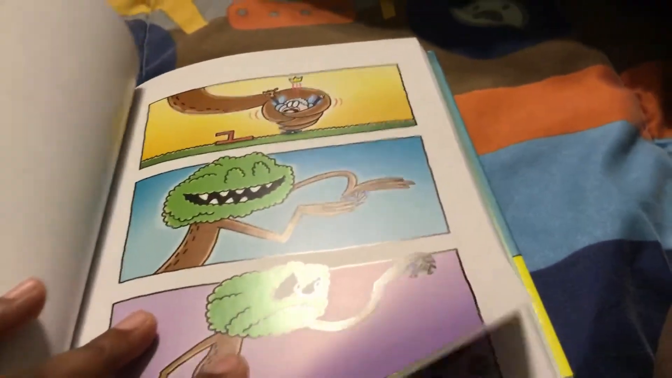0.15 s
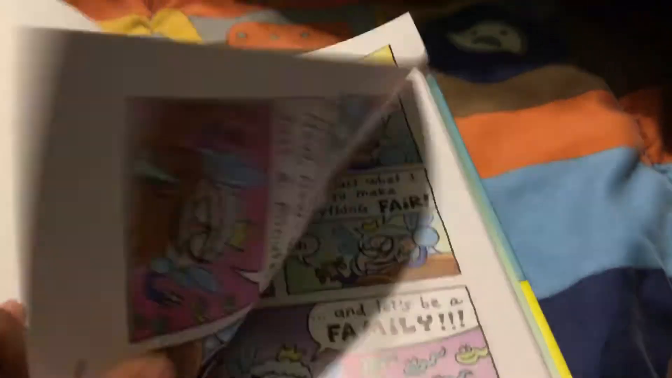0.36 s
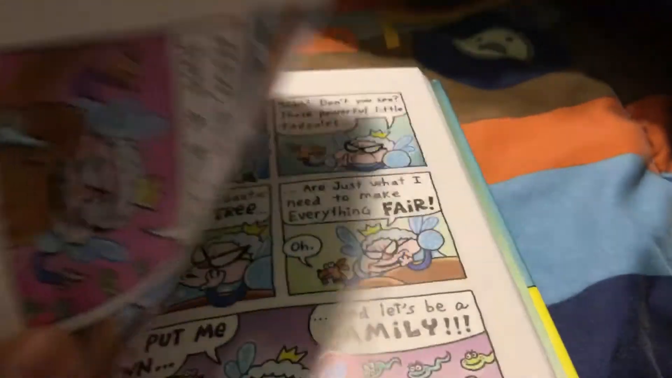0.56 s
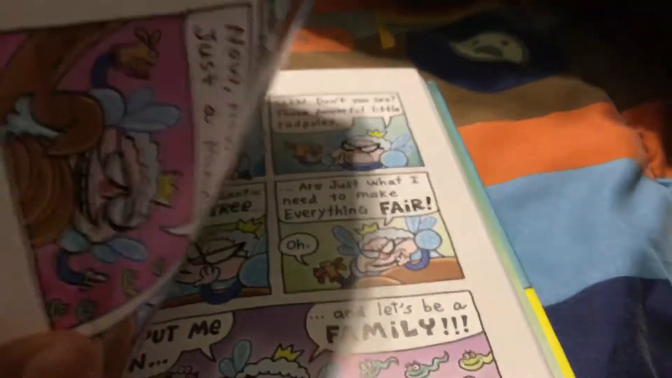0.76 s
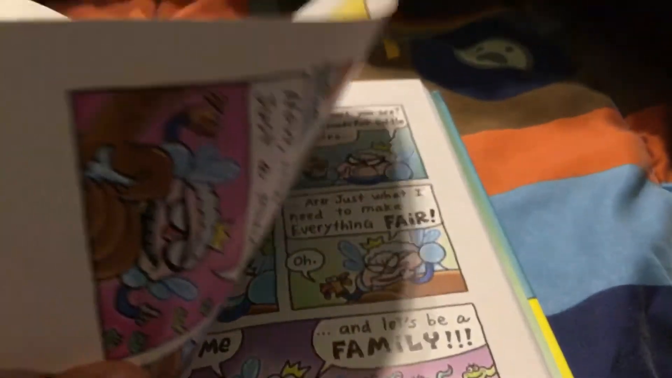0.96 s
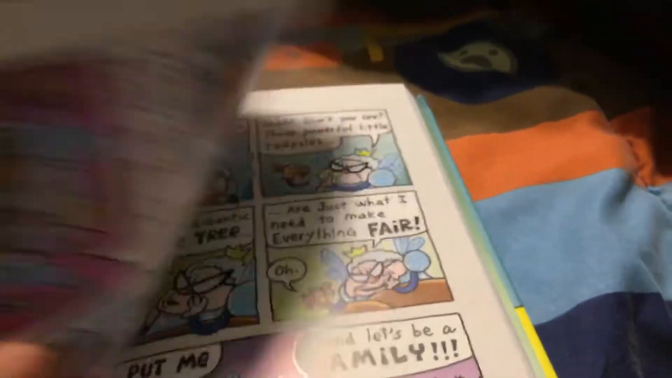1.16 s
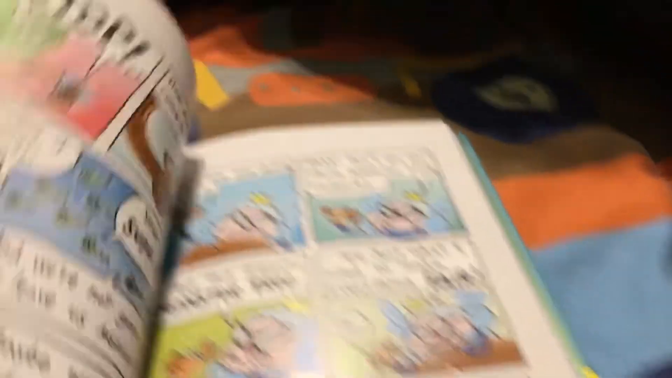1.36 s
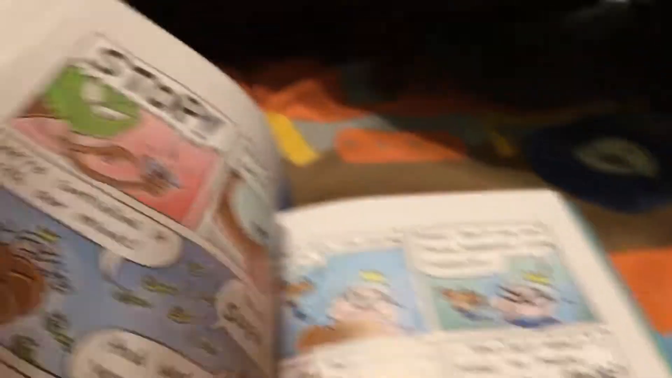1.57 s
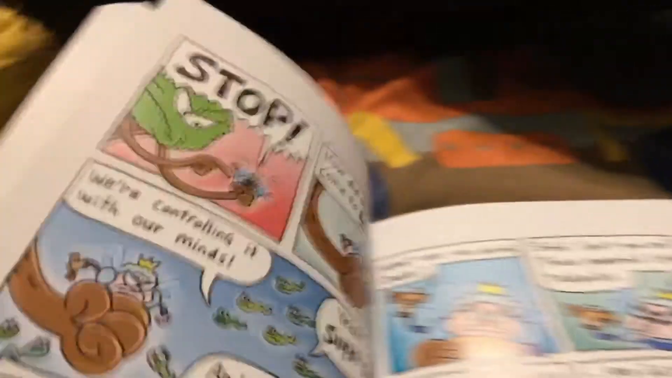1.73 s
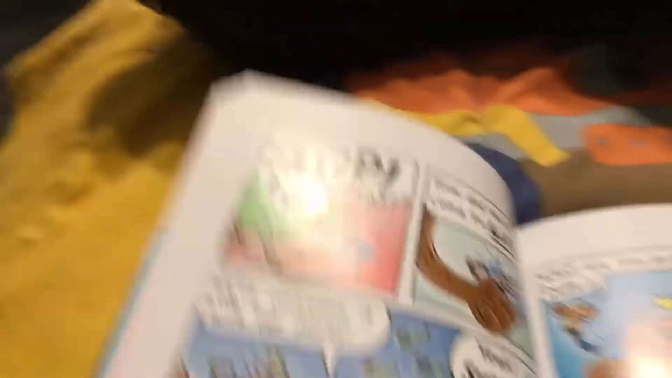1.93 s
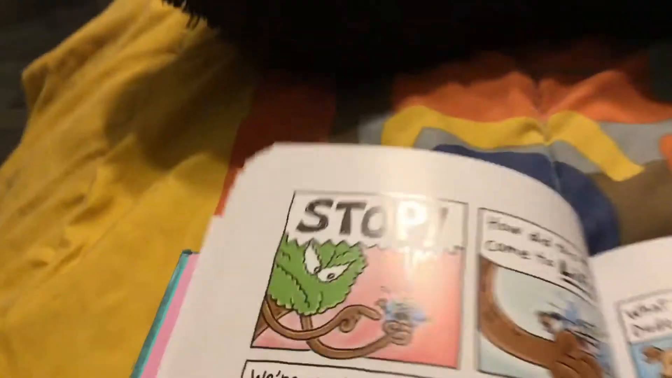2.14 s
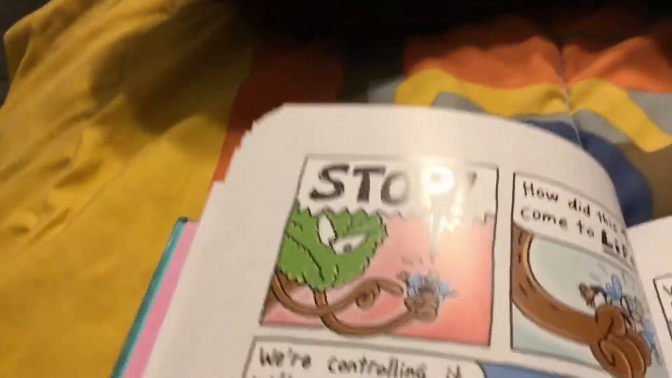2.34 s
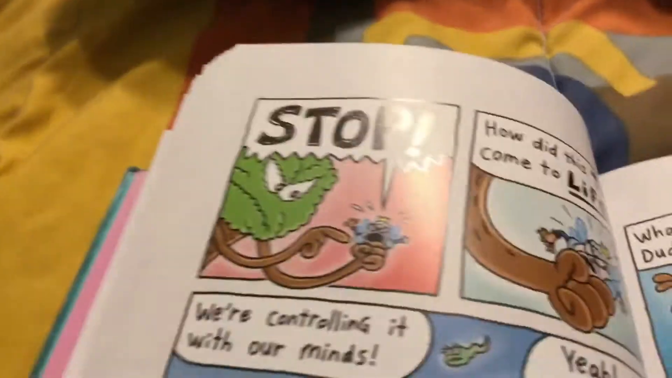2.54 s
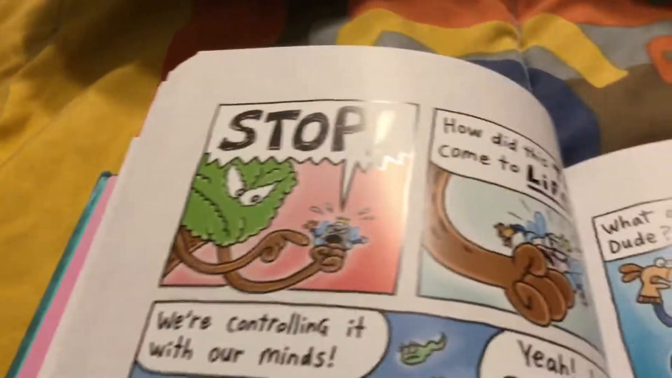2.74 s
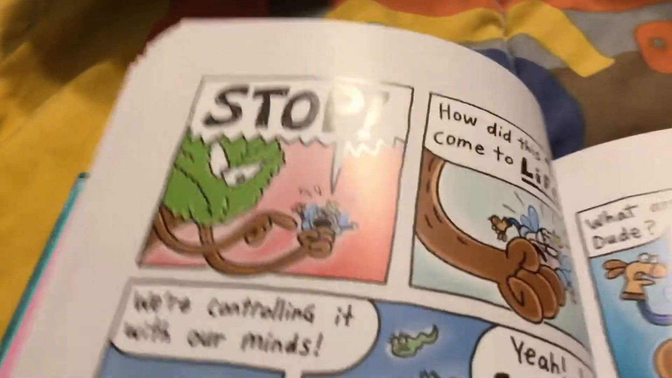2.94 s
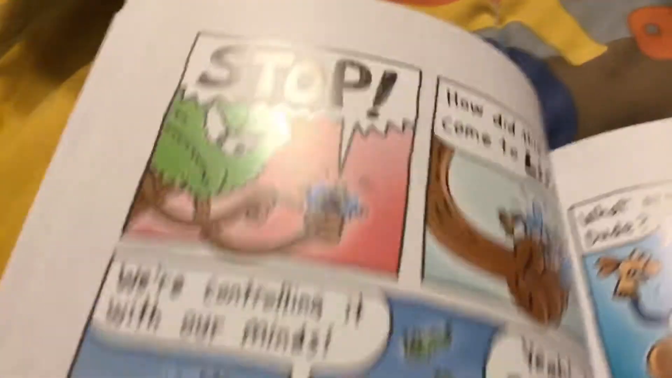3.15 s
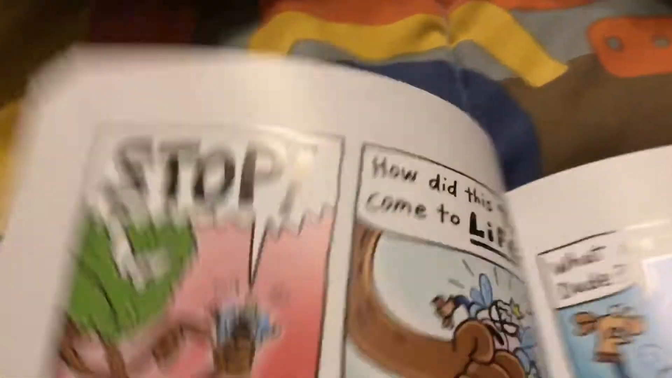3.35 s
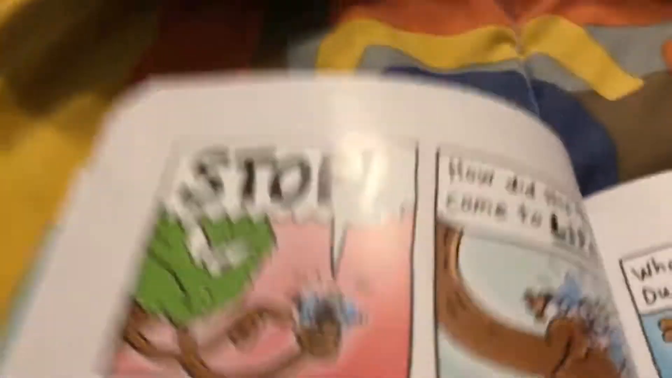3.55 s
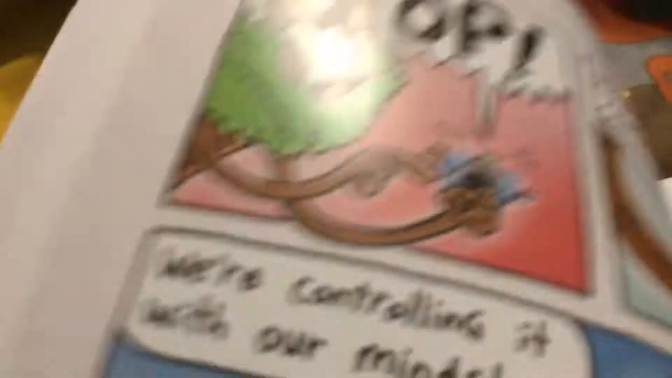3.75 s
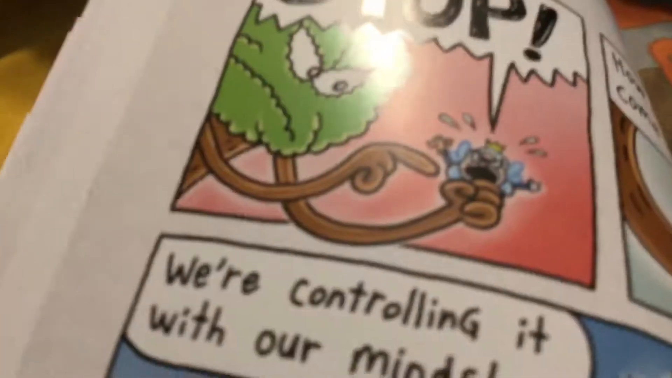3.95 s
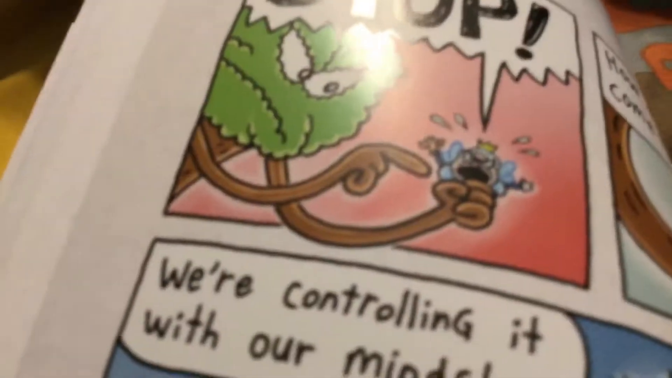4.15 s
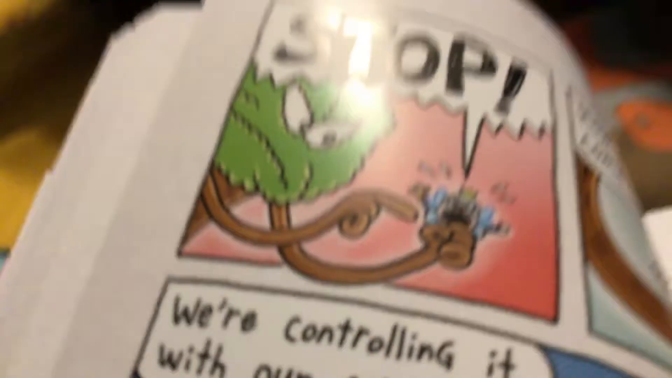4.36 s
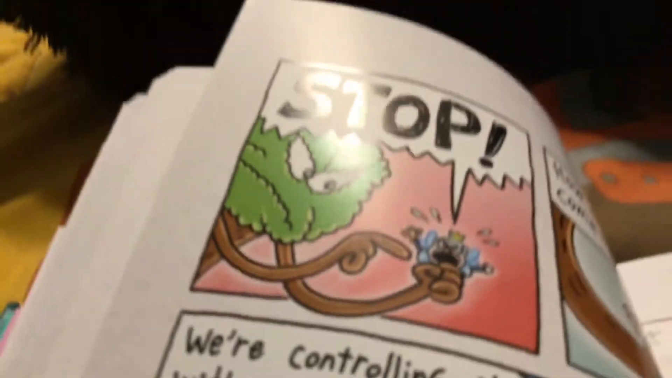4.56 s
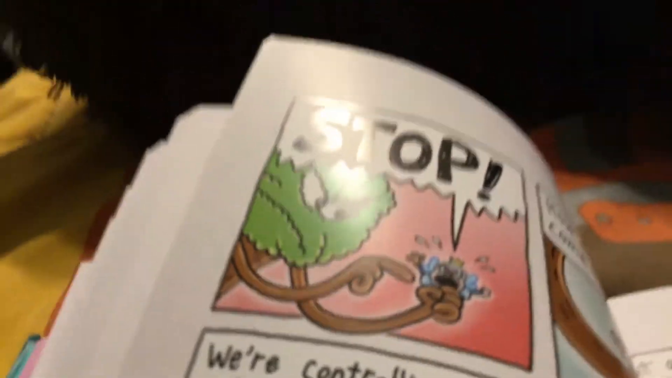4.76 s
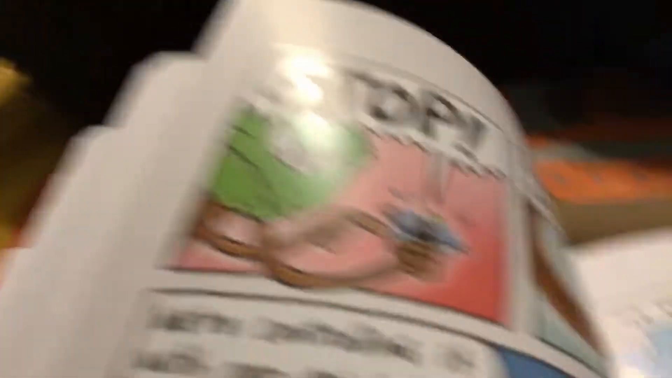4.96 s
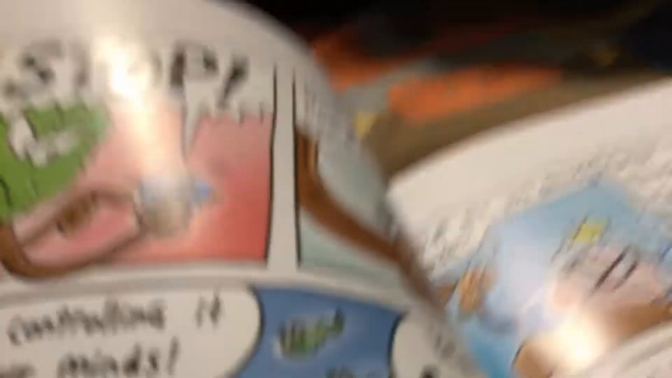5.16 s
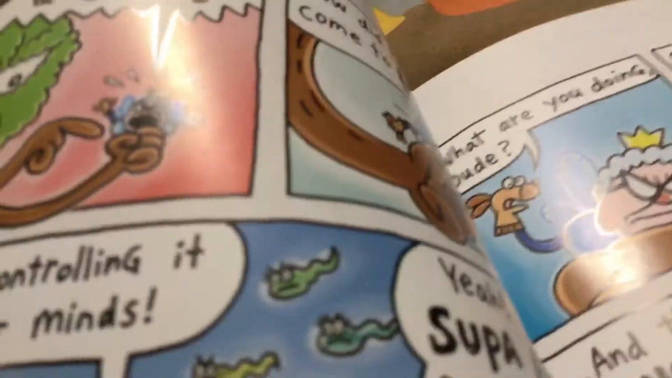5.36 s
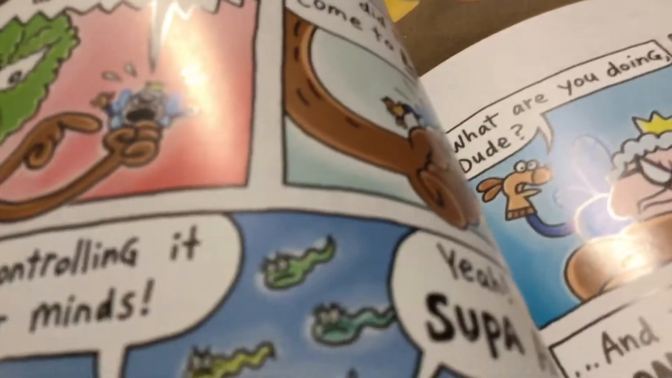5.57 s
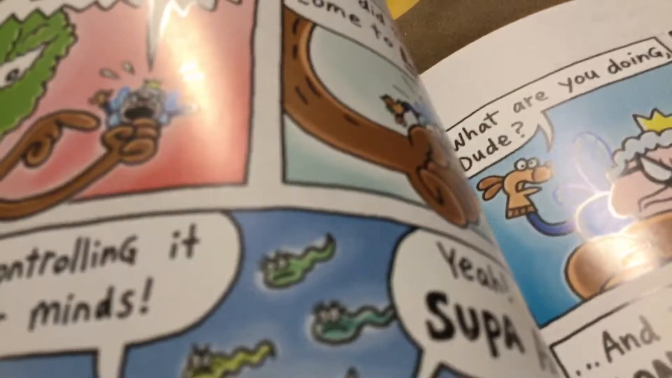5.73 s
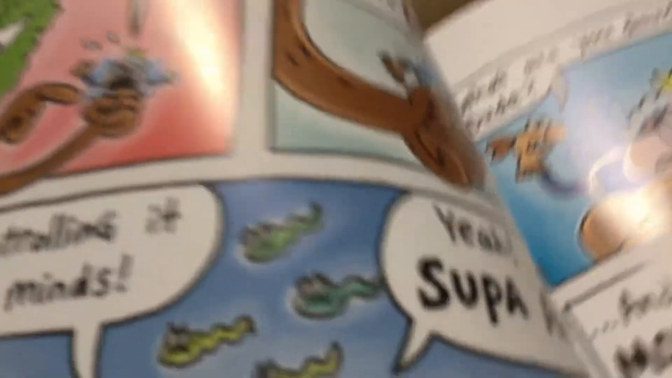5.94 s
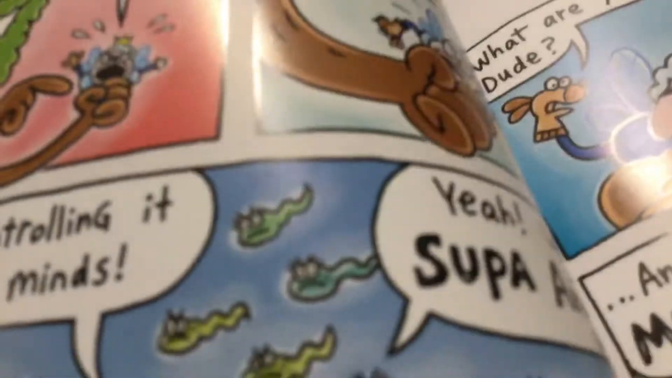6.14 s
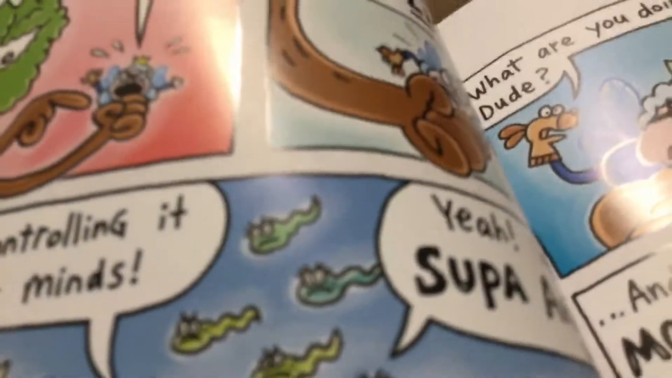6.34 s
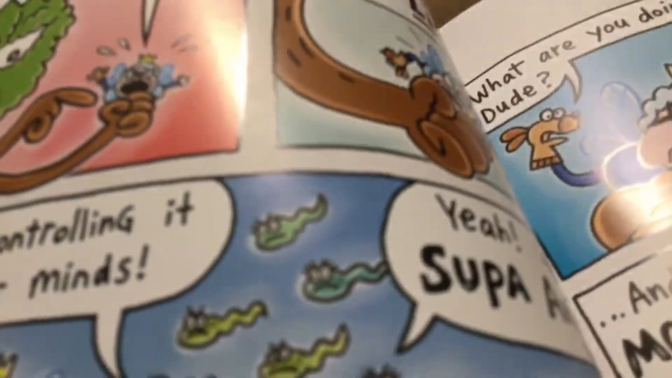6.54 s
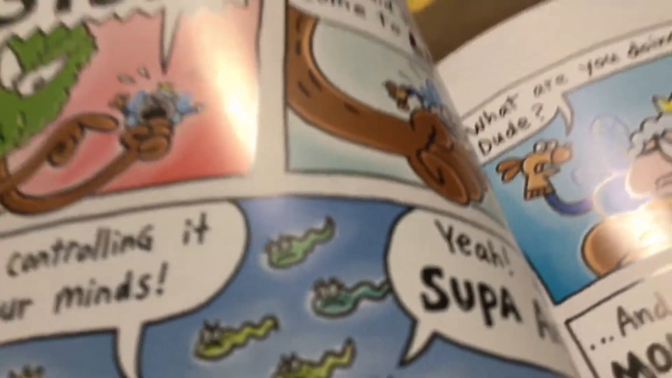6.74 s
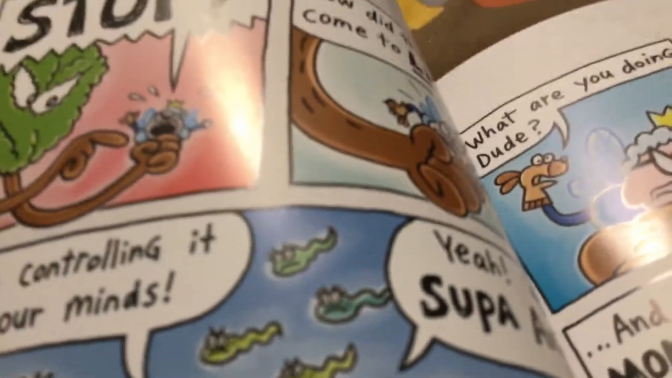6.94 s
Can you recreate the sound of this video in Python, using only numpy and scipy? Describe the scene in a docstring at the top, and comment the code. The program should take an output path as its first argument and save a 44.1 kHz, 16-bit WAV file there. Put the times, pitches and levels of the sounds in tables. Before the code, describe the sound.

Very close to the microphone in a small, quiet, dry room, a book's pages are handled. A faint bright slide comes first, then a quick run of low, thudding leaf flaps and crisp edge slaps. A quieter stretch of soft rubbing follows, broken by a sharp snap, then heavier finger drags with papery pops, another hard flap, and small fading crackles.

```python
"""In a small quiet room, close to a microphone, the pages of a book are turned and bent by hand.
Sheets slide with a grainy hiss and fingers drag on them: both are friction made of noise and small catches.
Bowed sheets ring along, and a loose leaf flaps as a dying swing that stirs low wafts of air.
Page edges slap in bursts of tiny impacts; bent paper and the binding snap with a crack and a bending wave."""
import sys
import numpy as np
from scipy import signal
from scipy.fft import rfft, irfft, next_fast_len
from scipy.io import wavfile

SR = 44100
rng = np.random.default_rng(int(sys.argv[2]) if len(sys.argv) > 2 else 0)


def generate_wav(signal):
    """Clip the signal to [-1, 1] and save it as 16-bit WAV at the path in sys.argv[1]."""
    frames = np.transpose(np.atleast_2d(signal))
    scaled = np.clip(frames, -1, 1) * 32767
    pcm = np.round(scaled).astype(np.int16)
    wavfile.write(sys.argv[1], SR, pcm)


N = 308686  # length in samples, about 7 s
TIME = np.arange(N) / SR
BURST = 4096  # length of one short sound in samples

# background of the quiet room: pitch_hz, level_db (relative)
FLOOR_COLOUR = [(30, -4.5), (100, 5), (250, -1), (500, -11), (1000, -54.5), (2000, -16), (5000, -20),
                (16000, -30)]
FLOOR_DB = -69.5
# the holding hand never quite rests: start_s, level_db (of its faint friction, before the rub trim)
HOLD = [(0, -71), (.85, -66.5), (1.2, -65), (1.6, -65.5), (1.9, -66), (2.38, -67), (3.3, -62.5),
        (4.0, -62.5), (4.63, -63.5), (5.2, -59.5), (5.7, -72.5), (6.2, -66.5), (6.5, -69), (7, -69)]
HOLD_HZ, HOLD_HISS_DB, HOLD_TOP_DB = 830, -7.5, -1.5
# fingers drag across a sheet: start_s, swell_s, ease_s, level_db (before the rub trim), centre_hz
RUBS = [(.28, 0.19, .11, -62, 2200), (1.075, .01, 0.081, -51, 1210), (1.18, 0.11, 0.077, -49, 1060),
        (1.32, 0.038, 0.18, -52.5, 1780), (1.61, .14, 0.077, -52, 1500), (2.0, 0.2, 0.063, -52.5, 1310),
        (2.48, 0.26, 0.035, -59, 1050), (2.98, .09, 0.17, -62, 900), (3.33, .17, 0.022, -54, 1600),
        (3.62, .17, 0.097, -47, 1210), (4.0, .16, 0.17, -46, 1160), (4.40, 0.071, 0.076, -55, 735),
        (4.72, 0.012, 0.083, -50, 1310), (4.87, .25, 0.057, -44, 1070), (5.19, 0.082, 0.052, -49, 970),
        (5.38, 0.058, 0.029, -52, 790), (5.55, 0.025, 0.034, -59.5, 900), (5.865, .025, 0.034, -60, 750),
        (5.94, 0.052, 0.15, -48.5, 940), (6.66, 0.09, .08, -63, 890)]
# one sheet slides over another: start_s, swell_s, ease_s, level_db, top_db (top octave against the hiss)
SLIDES = [(.13, 0.022, 0.17, -65, 6.5), (.225, 0.085, 0.089, -55, 1.5), (.37, .085, 0.12, -55, 2.5),
          (1.18, .04, 0.097, -55, -10), (1.29, 0.051, 0.13, -49.5, -1), (1.44, 0.034, 0.097, -48.5, -7.5),
          (1.61, .1, 0.13, -50, -3), (1.86, 0.011, 0.14, -61.5, -5), (2.02, .16, 0.078, -56, -3),
          (2.5, .22, .06, -65.5, -6), (2.96, .08, 0.083, -66.5, -7), (3.152, .025, 0.05, -49, -4.5),
          (3.22, 0.047, 0.034, -58.5, -8), (3.31, 0.18, .1, -55.5, -5.5), (3.68, .11, 0.072, -51.5, -3),
          (4.03, 0.12, 0.038, -56, -14), (4.21, 0.074, 0.053, -52, -21), (4.72, 0.033, 0.076, -67.5, -1),
          (4.91, 0.085, .03, -58, -8), (5.01, 0.016, 0.16, -44, -10.5), (5.15, 0.033, .16, -62, -13),
          (5.38, .06, 0.029, -66, -12), (5.94, 0.044, 0.12, -57.5, -5), (6.49, 0.071, 0.069, -70.5, 3),
          (6.72, 0.022, 0.065, -69, -4)]
# a stroke grows by SWELL dB to its peak, eases by EASE dB, and grips and lets go within the edge time
RUB_SWELL_DB, RUB_EASE_DB, RUB_EDGE_S = 11, 10, 0.0071
SLIDE_SWELL_DB, SLIDE_EASE_DB, SLIDE_EDGE_S = 10.5, 12.5, 0.014
# colour of the sliding hiss: pitch_hz, level_db (relative)
HISS_COLOUR = [(1200, -29), (2300, -3), (3100, 4.5), (4500, 3.5), (5800, 5), (7400, -0.5), (9000, -3.5),
               (16000, -7.5)]
# colour of a crack: pitch_hz, level_db (relative)
CRACK_COLOUR = [(1000, -16), (2500, -3), (4200, 0), (6000, -4), (8200, 1), (12000, -3), (16000, -9)]
# colour of stirred air: pitch_hz, level_db (relative)
WAFT_COLOUR = [(20, -36), (40, -6), (70, 4), (120, 1.5), (220, -1.5), (350, -7), (700, -49.5), (2000, -58)]
# a bowed sheet rings while it is stroked: start_s, length_s, level_db, pitch_hz (midway), glide_octaves_per_s
SWISHES = [(0.112, .1, -63.5, 7530, 4), (0.279, .26, -56.5, 7170, -0.2), (1.388, 0.1, -57.5, 1405, 2),
           (2.0, .16, -57.5, 1262, 0), (2.046, 0.2, -63, 2800, 0.5), (3.025, 0.097, -57.5, 730, 1),
           (3.147, .15, -57.5, 7300, -2), (3.269, 0.12, -57.5, 755, 0), (3.371, .17, -55, 1200, 2),
           (3.456, 0.072, -51, 2770, -.5), (3.458, 0.15, -61.5, 7030, -1.5), (3.66, .13, -51.5, 1280, -2),
           (6.522, 0.074, -69, 8350, 3)]
# a loose leaf swings and pushes air: start_s, level_db (near the peak), swing_hz (middle of its slowing rate)
FLAPS = [(0.563, -49.5, 238), (0.678, -48, 107), (0.8197, -28.5, 91.5), (.96, -39, 103),
         (1.021, -35.5, 104), (1.07, -24, 106.5), (1.1716, -22, 107), (1.208, -22.5, 85),
         (1.2391, -25.5, 106), (1.262, -29.5, 180), (1.289, -31.5, 110), (1.302, -34.5, 220),
         (1.373, -29, 148), (1.411, -41, 98), (1.4797, -32.5, 159), (1.718, -32.5, 221), (1.727, -32.5, 77),
         (1.752, -36.5, 167), (2.517, -50, 333), (3.605, -37.5, 112), (3.782, -38.5, 302),
         (5.1134, -21, 189), (5.131, -34.5, 129), (5.866, -46, 172), (5.894, -49, 110), (6.015, -52, 111),
         (6.665, -47.5, 128)]
SWINGS = 6.05  # swings until a leaf has come to rest (60 dB down)
# a page edge slips free and strikes its neighbours:
# time_s, level_db, rise_ms, fall_ms, centre_hz, slope_db_per_octave (above the centre)
SLAPS = [(0.676, -49.5, 9.8, 6.8, 1320, -2), (0.82, -38.5, 0.13, 4, 765, -1), (.867, -58, 3, 3, 3000, -11),
         (0.9038, -54.5, 1.2, 0.89, 1200, -6.5), (0.9124, -57, 1, 2, 1500, -6),
         (0.961, -45.5, 2.5, 1.3, 2000, -10), (1.0189, -47, 1.3, 2.1, 2800, -7.5),
         (1.0664, -30.5, 0.56, 3.4, 2950, -10), (1.078, -33, 0.93, 1.5, 2540, -23),
         (1.1682, -30, 1.5, 4.2, 4270, -10.5), (1.173, -39, .5, 1.5, 800, -2),
         (1.2032, -35.5, 0.65, 1.7, 1900, -5.5), (1.217, -38, 2.1, 1.3, 800, -1),
         (1.2348, -43, 3, 2.3, 1400, -5.5), (1.245, -44, 2.2, 1.5, 800, -4.5),
         (1.266, -51, 1.5, 1.7, 1500, -7), (1.2928, -49, 0.73, 2.7, 1300, -12),
         (1.3676, -29.5, 0.64, 6.1, 1630, -13), (1.379, -34, .5, 6.9, 1660, -19),
         (1.471, -37, 3.3, 4.6, 4700, -12.5), (1.4828, -31, 3.8, 4.9, 3850, -12),
         (1.624, -48, 1.6, 2.1, 1400, -0.5), (1.657, -41.5, 1.3, 3.9, 5960, -10),
         (1.689, -28.5, 5.2, 2, 7800, -25), (1.692, -22.5, 3.2, 0.39, 5360, -14),
         (1.716, -39.5, 1.4, 1.9, 790, -2), (1.731, -47, 2.6, 4.4, 800, -4.5),
         (1.7549, -37.5, 3.5, 2.8, 1940, -8.5), (1.784, -42, 4.9, 10, 5300, -17),
         (5.027, -40, 3.5, 4.4, 1200, -4.5), (5.1102, -28.5, 1.4, 1.1, 4400, -23),
         (5.1216, -33, 1, 1.8, 900, -19), (5.1328, -27, 0.51, 1.9, 4640, -39),
         (5.892, -50.5, 5.2, 2, 2520, -9.5), (6.742, -46, 1.3, 1.3, 3500, -24)]
# bent paper or the binding buckles: time_s, body_level_db, body_pitch_hz, crack_level_db (before the crack lift)
SNAPS = [(1.304, -47, 458, -68), (1.7709, -47.5, 1080, -41.5), (1.816, -67, 1640, -51.5),
         (1.8947, -67, 2280, -44), (2.3752, -27.5, 1180, -34), (2.596, -42.5, 890, -78),
         (2.609, -51.5, 1400, -79), (2.7426, -44.5, 1180, -82), (3.5164, -32.5, 1060, -67),
         (3.602, -38.5, 620, -56), (3.6043, -46, 560, -75), (3.7845, -48, 493, -61),
         (3.8336, -48.5, 780, -71), (3.8599, -40, 1020, -68), (3.8774, -39, 1560, -79),
         (3.8819, -40.5, 880, -75), (3.9421, -41.5, 950, -47), (4.026, -54, 1060, -78),
         (4.1704, -31.5, 2120, -38.5), (4.202, -44.5, 880, -67), (4.2977, -51.5, 1010, -54),
         (4.796, -49.5, 490, -75), (4.9003, -43.5, 560, -77), (4.9763, -41.5, 660, -62),
         (5.0689, -39, 1170, -55), (5.1155, -26, 480, -42), (5.132, -27, 970, -35.5),
         (5.4494, -55, 760, -69), (5.8653, -34, 520, -85), (5.8932, -38.5, 790, -48),
         (5.902, -44.5, 686, -63), (5.9589, -43.5, 573, -75), (5.9773, -59, 980, -48.5),
         (5.9868, -42.5, 840, -48), (6.015, -39, 706, -72), (6.0299, -45, 770, -75),
         (6.0453, -40, 765, -68), (6.133, -48, 780, -51.5), (6.7032, -56, 1870, -80),
         (6.743, -47, 1300, -49), (6.7916, -55, 1800, -62.5), (6.8257, -58, 1500, -67),
         (6.9317, -59.5, 650, -70), (6.94, -60.5, 1500, -66), (6.9603, -59.5, 1720, -60)]
ROOM_T60_S, ROOM_DB = 0.14, -28.5  # time for the echo to fall 60 dB, and its level
# colour of the microphone: pitch_hz, level_db (relative)
MIC_COLOUR = [(2500, 0), (3600, -1), (4400, 1), (5500, -2), (7400, 2), (8600, 0), (9900, -5), (12500, 0),
              (15500, -1)]
TOP_HZ = 16100  # nothing much is heard above this


def undb(db):
    """Decibels to gain."""
    return 10 ** (np.asarray(db) / 20)


def unit(x):
    """Scale to an average strength (rms) of 1."""
    return x / np.sqrt(np.mean(x ** 2))


def burst(x, db):
    """Scale a short sound so that its energy, spread over 5 ms, has this level."""
    return x * undb(db) / np.sqrt(np.sum(x ** 2) / (.005 * SR))


def bins(x):
    """Frequencies of the spectrum of x, kept at 1 Hz or more."""
    return np.maximum(np.fft.rfftfreq(len(x), 1 / SR), 1)


def shape(x, gain):
    """Filter x by a gain given as a function of frequency."""
    padded = np.pad(x, (0, next_fast_len(len(x)) - len(x)))
    spectrum = rfft(padded) * gain(bins(padded))
    return irfft(spectrum, len(padded))[:len(x)]


def colour(x, points):
    """Filter x by a spectrum of (Hz, dB) points."""
    hz, db = np.transpose(points)
    return shape(x, lambda f: undb(np.interp(np.log(f), np.log(hz), db)))


def resonance(f, hz, q):
    """Response of one damped resonance, gain 1 at its centre; a higher q is narrower."""
    return 1 / (1 + 1j * q * (f / hz - hz / f))


def walk(rate):
    """A wandering random line that heads for a new chance value this many times a second."""
    steps = rng.standard_normal(4096)
    return 0.85 * np.interp(TIME * rate, np.arange(len(steps)), steps)


def add(out, s, x):
    """Mix x into out from time s."""
    i = int(s * SR)
    out[i:i + len(x)] += x[:N - i]


def grains(rate, spread_db, share):
    """Friction: countless tiny fibre contacts (noise), with larger catches at this rate per second."""
    sizes = undb(spread_db * np.minimum(rng.exponential(size=N), 4))
    catches = (rng.random(N) < rate / SR) * rng.choice([-1, 1], N) * sizes
    return unit(rng.standard_normal(N) + share * unit(catches))


def sheet(f, spread_db, spacing=.2):
    """Gain of a bent sheet: its peaks and dips lie elsewhere with every bend (spacing in octaves)."""
    place = np.log2(f) / spacing
    return undb(spread_db * np.interp(place, np.arange(256), rng.uniform(-1.23, 1, 256)))


def quiet_room():
    """The room's steady background: coloured noise."""
    return unit(colour(rng.standard_normal(N), FLOOR_COLOUR)) * undb(FLOOR_DB)


def strokes(table, swell_db, ease_db, edge_s, rest_db, rest_tone, dome=1.21):
    """Level and tone of friction: strokes grip, swell, ease and let go; louder ones set the tone more."""
    power = undb(rest_db) ** 2
    tone = power * rest_tone
    for start, swell_s, ease_s, db, own_tone in table:
        peak = start + swell_s
        end = peak + ease_s
        before = np.clip((peak - TIME) / swell_s, 0, 1)
        after = np.clip((TIME - peak) / ease_s, 0, 1)
        outside = np.maximum(np.maximum(start - TIME, TIME - end), 0) / edge_s
        own_db = db - swell_db * before ** dome - ease_db * after ** dome
        own = undb(own_db) ** 2 / (1 + (2 * outside) ** 4)
        power = power + own
        tone = tone + own * own_tone
    return 10 * np.log10(power), tone / power


def rub(db, centre_hz, q=0.9, trim_db=-5.0):
    """Fingers drag on the sheet; its resonances come and go as the free length changes."""
    friction = grains(rate=320, spread_db=0.0, share=0.28)
    out, power = 0, 0
    for hz in np.geomspace(400, 2900, num=14):
        band = unit(shape(friction, lambda f: np.abs(resonance(f, hz, 5)) ** 2))
        wander = undb(2.2 * walk(9) + 1.2 * walk(45))
        gain = np.abs(resonance(hz, centre_hz, q)) * wander
        out = out + band * gain
        power = power + gain ** 2
    return unit(out / np.sqrt(power)) * undb(db + trim_db)


def hiss(db, top_db, flicker_db=1.5):
    """Sheet slides on sheet; the colour shifts with the contact, and a light, fast touch adds the top octave."""
    rest = colour(grains(rate=500, spread_db=7.5, share=0.39), HISS_COLOUR)
    body = 0
    # peel off one band after another from below; what is left is the top
    for hz in np.geomspace(2200, 9000, num=7):
        band = shape(rest, lambda f: 1 / (1 + (f / hz) ** 20))
        rest = rest - band
        body = body + band * undb(2 * walk(11))
    sheen = unit(rest) * undb(top_db)
    return (unit(body) + sheen) * undb(db + flicker_db * walk(110))


def bend(x, spread_db=4.0, spacing=.09, size=8192):
    """The sheet keeps changing its bow, so the peaks and dips of its colour melt into new patterns."""
    padded, window = np.pad(x, size), signal.windows.hann(size, sym=False)
    out = np.zeros(len(padded))
    # overlapping pieces, each with its own bend
    for i in range(0, N + size, size // 2):
        piece = padded[i:i + size] * window
        out[i:i + size] += shape(piece, lambda f: sheet(f, spread_db, spacing))
    return out[size:size + N]


def ticks(rub_db, rate=12, tick_db=-16, spread_db=4, body_hz=1100, q=0.76, crack_db=-9, smear_s=0.001):
    """Tiny chance bucklings of the handled paper (rate per second), stronger the harder it is rubbed."""
    sizes = undb(spread_db * np.minimum(rng.exponential(size=N), 2))
    kicks = (rng.random(N) < rate / SR) * sizes
    t = np.arange(-BURST // 8, BURST // 8) / SR
    # each kick becomes a very short puff of noise
    kicks = signal.fftconvolve(kicks, np.exp(-np.abs(t) / smear_s), "same") * rng.standard_normal(N)
    body = unit(shape(kicks, lambda f: resonance(f, body_hz, q) * resonance(f, body_hz, q / 4)))
    crack = unit(colour(kicks, CRACK_COLOUR)) * undb(crack_db)
    return (body + crack) * undb(rub_db + tick_db)


def stirred(rub_db, drag_db=-65, follow=0.29, wake_db=-17, wake_s=0.04, lead_s=0.0064):
    """Level of moving air: it rises with the hand's effort, and each flap leaves a fading wake."""
    power = undb(drag_db + follow * (rub_db - rub_db.mean())) ** 2
    for s, db, _ in FLAPS:
        fade_s = np.where(TIME < s, lead_s, wake_s)
        power = power + undb(db + wake_db) ** 2 * np.exp(-2 * np.abs(TIME - s) / fade_s)
    return 10 * np.log10(power)


def air(db, air_db=-1.5, crinkle_db=-12, crinkle_hz=3000, low_hz=800):
    """The moving leaf stirs low, uneven wafts of air and crinkles finely the harder it flexes."""
    waft = unit(colour(rng.standard_normal(N), WAFT_COLOUR)) * undb(air_db + 3.7 * walk(18))
    crinkle = grains(rate=170, spread_db=3.5, share=9.3)
    crinkle = unit(shape(crinkle, lambda f: 1 / (1 + 1j * f / crinkle_hz) / (1 + (low_hz / f) ** 2)))
    flex = np.clip(undb(db - db.max() + 5.5), 0, 1)
    return (waft + crinkle * flex * undb(crinkle_db)) * undb(db)


def swishes(width=0.13, widest_hz=900, catch_db=2, second=2.1, second_db=-7):
    """Uneven friction feeds two resonances of a bowed sheet, which glide as the bow tightens or relaxes."""
    out = np.zeros(N)
    for s, length_s, db, hz, glide in SWISHES:
        t = np.arange(int(length_s * SR)) / SR - length_s / 2
        fade = signal.windows.tukey(len(t), .5)
        for mode_hz, mode_db in (hz, db), (second * hz, db + second_db):
            # slow noise as the loudness of a tone makes a band of noise around its pitch
            width_hz = min(width * mode_hz, widest_hz)
            drive = shape(rng.standard_normal(SR // 2), lambda f: 1 / (1 + (f / width_hz) ** 2))
            drive = unit(drive)[:len(t)]
            turn = 2 * np.pi * np.cumsum(mode_hz * 2 ** (glide * t)) / SR
            add(out, s, np.sqrt(2) * drive * np.sin(turn) * undb(mode_db) * fade)
    return out * undb(catch_db * walk(90))


def flaps(push_s=0.0033, sag=0.13, sag_s=0.0068, overtone=2.54, overtone_db=-13, eddy_db=-16, eddy_hz=300):
    """The leaf swings ever slower as it slackens, with a second bending mode and eddies off its edge."""
    out, t = np.zeros(N), np.arange(2 * BURST) / SR
    for s, db, hz in FLAPS:
        swing_hz = hz * (1 + sag * (2 * np.exp(-t / sag_s) - 1))
        turn = 2 * np.pi * np.cumsum(swing_hz) / SR
        # the second mode's pitch ratio differs by chance from flap to flap
        second = np.sin(overtone * turn * rng.uniform(0.668, 1.12))
        swing = np.sin(turn) + undb(overtone_db) * second
        eddies = unit(shape(rng.standard_normal(len(t)), lambda f: resonance(f, eddy_hz, 1.43) ** 2))
        push = (1 - np.exp(-(t / push_s) ** 2)) * np.exp(-np.log(1000) * t * hz / SWINGS)
        add(out, s, (swing + undb(eddy_db) * eddies) * push / push.max() * undb(db))
    return out


def slaps(tail_db=-25, tail_s=0.022, low_slope_db=7, lowest_hz=800):
    """Contact runs along the page edge: a crowd of tiny impacts swells and stops; the sheet shivers briefly."""
    out, t = np.zeros(N), (np.arange(BURST) - BURST // 2) / SR
    for s, db, rise_ms, fall_ms, hz, slope_db in SLAPS:
        swell = np.exp(-np.abs(t / (np.where(t < 0, rise_ms, fall_ms) / 1e3)) ** 1.17)
        shiver = undb(tail_db) * (t > 0) * np.exp(-np.abs(t) / tail_s)
        # the strength jumps by chance every 8 samples
        strength = undb(1.7 * np.repeat(rng.standard_normal(BURST // 8), 8))
        slap = rng.standard_normal(BURST) * strength * (swell + shiver)
        slap = shape(slap, lambda f: undb(np.log2(f / hz) * np.where(f < hz, low_slope_db, slope_db)))
        # a thin edge radiates low notes poorly
        slap = shape(slap, lambda f: sheet(f, spread_db=5) * (f < TOP_HZ) / (1 + (lowest_hz / f) ** 3))
        add(out, s + t[0], burst(slap, db))
    return out


def snaps(crack_lift_db=1, q=0.86, reach=1.66, lag_s=0.00039, shiver=0.069, shiver_s=0.0018):
    """Fibres give way in a crack, with a bending wave whose low notes travel slower."""
    out, t = np.zeros(N), (np.arange(BURST) - BURST // 4) / SR
    kick = signal.unit_impulse(BURST, BURST // 4)
    # a short burst just after the crack, within a faint spread of noise around it
    fibres = .33 * (t > 0) * np.exp(-np.abs(t) / .0004) + .04 * np.exp(-np.abs(t) / .0015)
    for s, db, hz, crack_db in SNAPS:
        chance = rng.standard_normal((2, BURST))
        wave = kick + shiver * chance[0] * (t > 0) * np.exp(-np.abs(t) / shiver_s)
        wave = shape(wave, lambda f: resonance(f, hz, q) * resonance(f, hz, 0.11)
                     # a delay of lag_s at 1000 Hz, longer for lower notes
                     * np.exp(-4j * np.pi * lag_s * np.sqrt(f * 1e3)))
        # the wave carries little far below or above its pitch
        wave = shape(wave, lambda f: sheet(f, spread_db=4.0) / (1 + (f / (reach * hz)) ** 4 + (0.2 * hz / f) ** 2))
        crack = colour(kick + fibres * chance[1], CRACK_COLOUR)
        add(out, s + t[0] - lag_s, burst(wave, db))
        add(out, s + t[0], burst(crack, crack_db + crack_lift_db))
    return out


def room(x, first_s=0.0051, dull_hz=7000):
    """A weak, short echo from a furnished room: fading noise, dulled in the treble."""
    t = np.arange(SR // 2) / SR
    tail = rng.standard_normal(len(t)) * (t > first_s) * np.exp(-np.log(1000) * t / ROOM_T60_S)
    tail = shape(tail / np.sqrt(np.sum(tail ** 2)), lambda f: 1 / (1 + 1j * f / dull_hz))
    return x + undb(ROOM_DB) * signal.fftconvolve(x, tail)[:N]


def scene():
    """All the sounds of the book, heard in the room."""
    hold_db = np.interp(TIME, *np.transpose(HOLD))
    rub_db, rub_hz = strokes(RUBS, RUB_SWELL_DB, RUB_EASE_DB, RUB_EDGE_S, hold_db, HOLD_HZ)
    hiss_db, top_db = strokes(SLIDES, SLIDE_SWELL_DB, SLIDE_EASE_DB, SLIDE_EDGE_S,
                              hold_db + HOLD_HISS_DB, HOLD_TOP_DB)
    friction = bend(rub(rub_db, rub_hz) + hiss(hiss_db, top_db))
    handling = friction + ticks(rub_db) + air(stirred(rub_db))
    book = handling + swishes() + flaps() + slaps() + snaps()
    return (room(book) + quiet_room())[None]


def record(dry, ring_hz=4520, ring_q=30, ring=0.2):
    """The microphone colours the treble, rings briefly at one pitch and loses the deepest bass and very top."""
    sound = shape(colour(dry[0], MIC_COLOUR), lambda f: 1 + ring * resonance(f, ring_hz, ring_q))
    bass_cut = signal.butter(6, 38, "high", fs=SR, output="sos")
    top_cut = signal.ellip(10, .2, 70, TOP_HZ, fs=SR, output="sos")
    return signal.sosfilt(top_cut, signal.sosfilt(bass_cut, sound))[None]


dry = scene()
out = record(dry)
generate_wav(out)
```